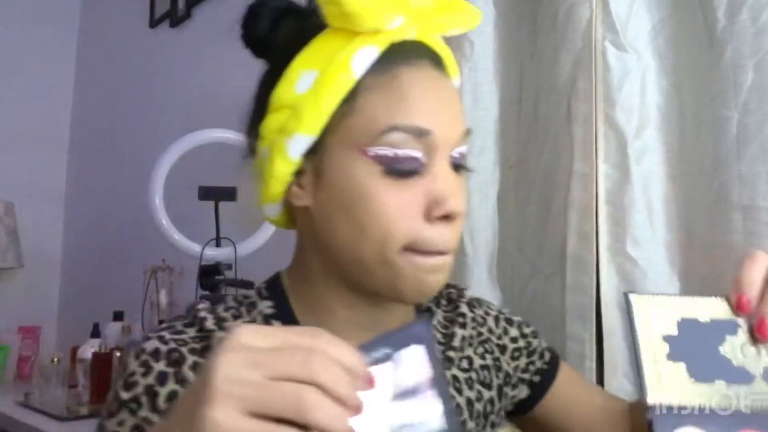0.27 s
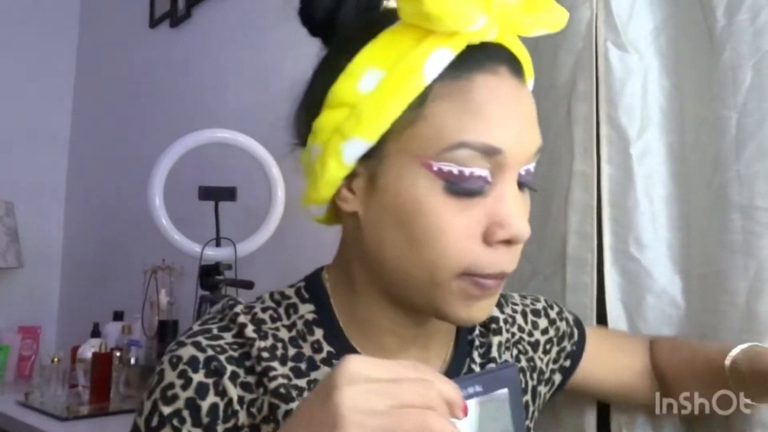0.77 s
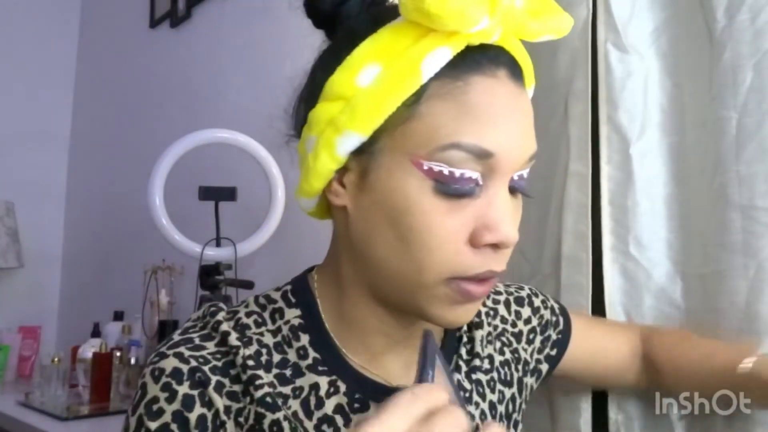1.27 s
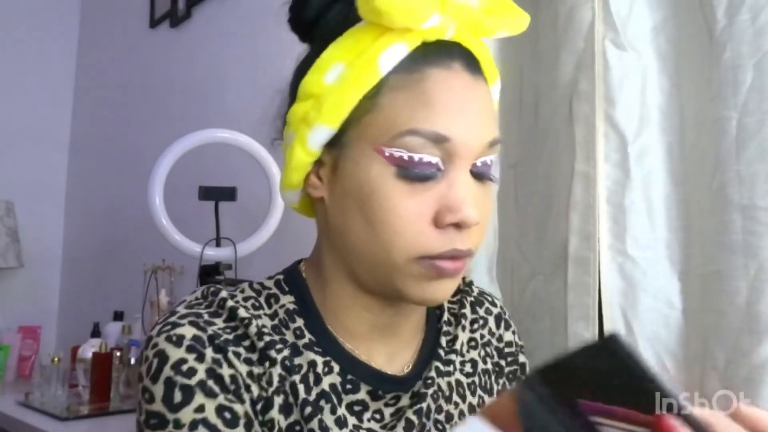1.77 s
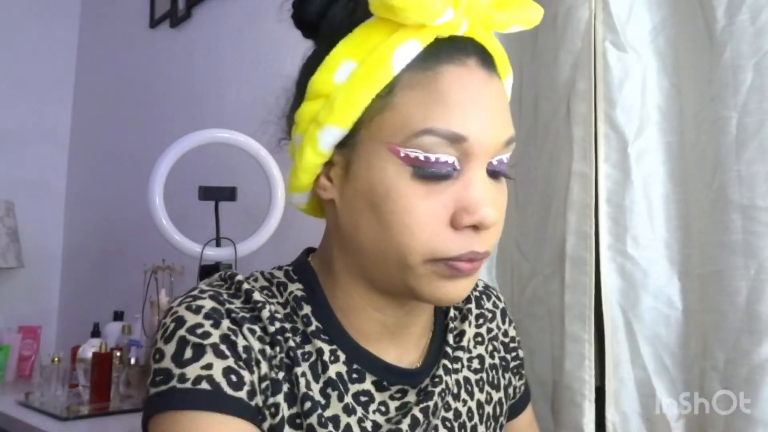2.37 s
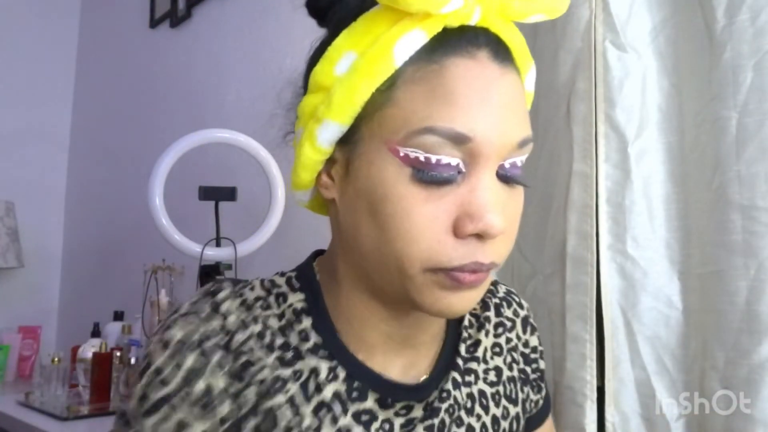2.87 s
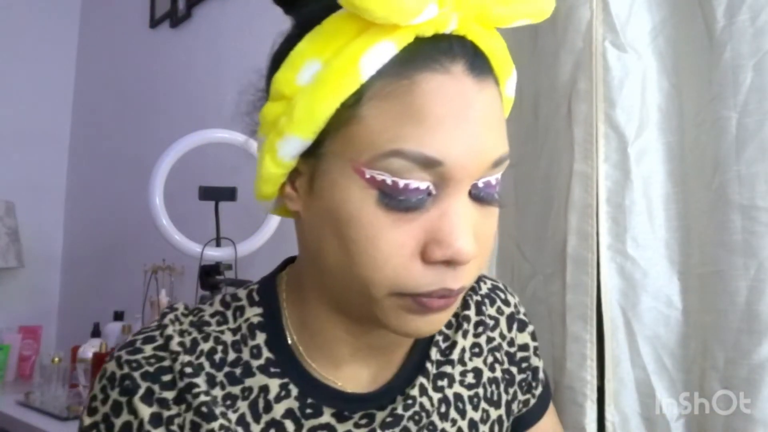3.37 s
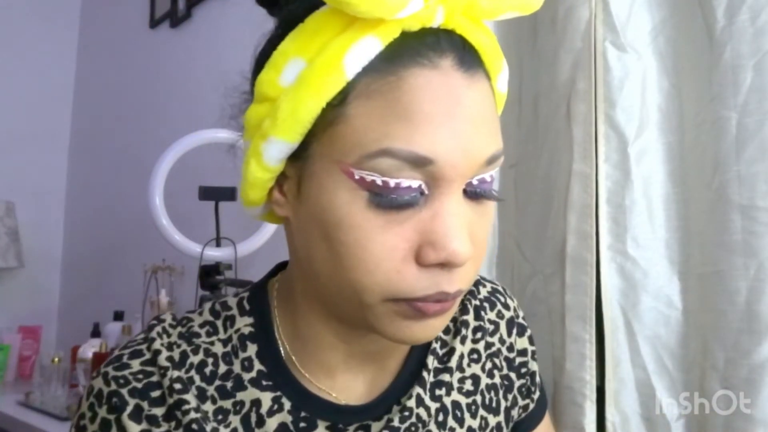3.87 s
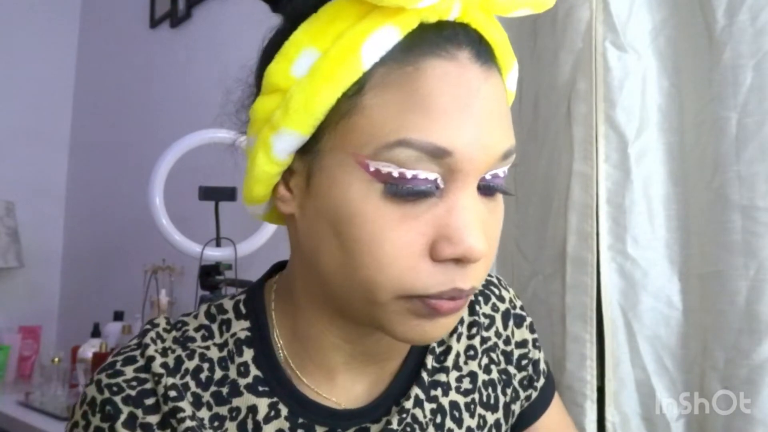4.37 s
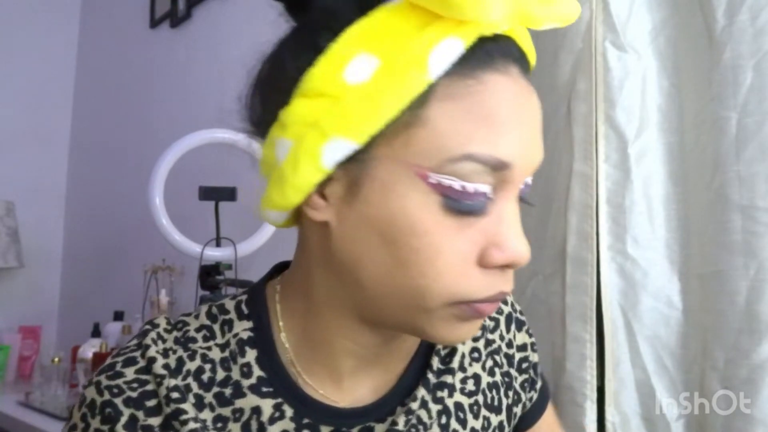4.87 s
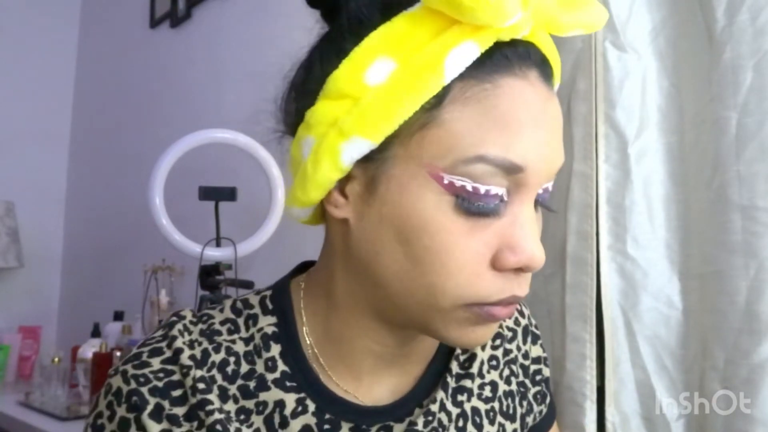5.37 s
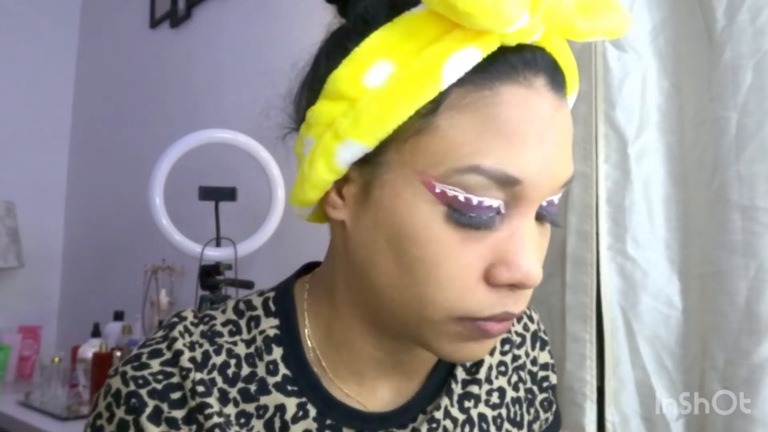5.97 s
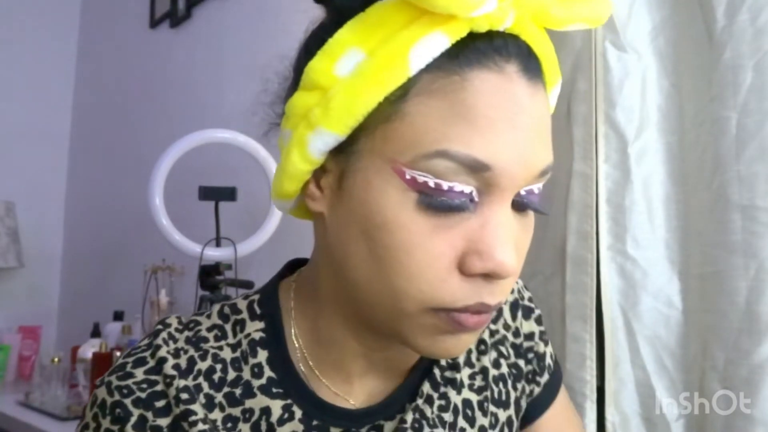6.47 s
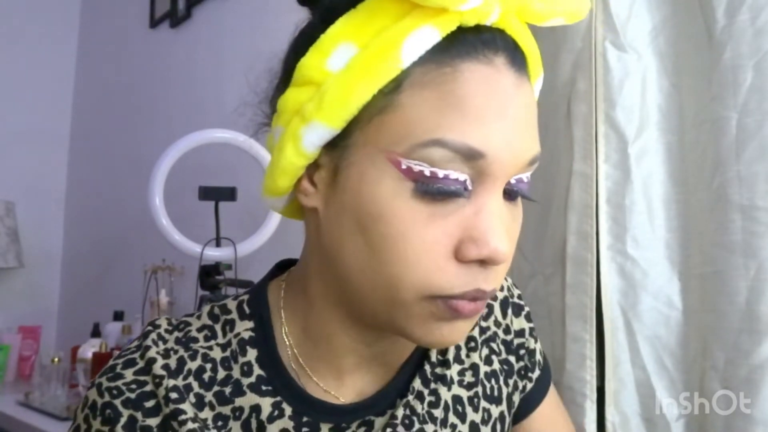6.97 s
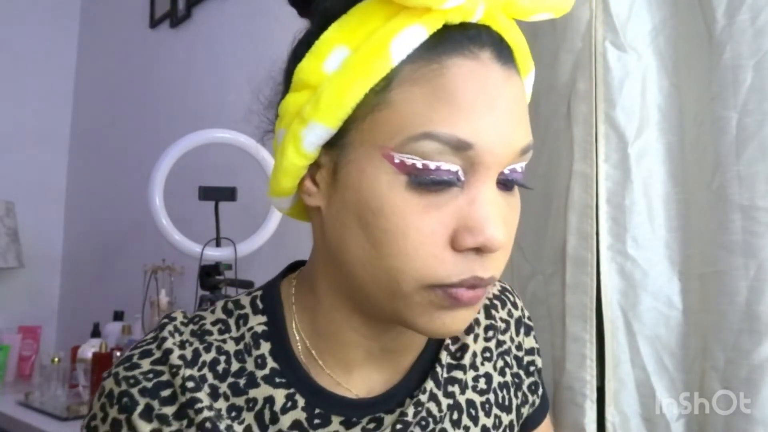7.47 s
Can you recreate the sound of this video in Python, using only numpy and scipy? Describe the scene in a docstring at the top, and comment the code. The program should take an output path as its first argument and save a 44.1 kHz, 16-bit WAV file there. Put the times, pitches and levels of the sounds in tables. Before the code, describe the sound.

Close, slightly dull stereo pickup of makeup things being handled indoors. First small drags and a boomy palette drop with a scrape, then a duller knock, then a scatter of faint ticks from brushes and a tiny metallic clink. After a quiet gap come the sharp clack, hollow taps and snaps of a plastic case. A wavering low fan drone runs throughout.

```python
"""A fan drones with a wavering hum over a low rumble and faint hiss in a small bedroom.
Makeup palettes are put down on a table, then brushes are sorted and a plastic case is handled.
Each contact is a click ringing the resonances of its object, with echoes from table and walls.
Sliding and scuffing in between are noise, shaped into short swells and coloured by filters."""
import sys
import numpy as np
from scipy import signal
from scipy.fft import rfft, irfft, next_fast_len
from scipy.io import wavfile
from scipy.ndimage import map_coordinates

SR = 44100
rng = np.random.default_rng(int(sys.argv[2]) if len(sys.argv) > 2 else 0)


def generate_wav(signal):
    """Clip the signal to [-1, 1] and save it as 16-bit WAV at the path in sys.argv[1]."""
    frames = np.transpose(np.atleast_2d(signal))
    scaled = np.clip(frames, -1, 1) * 32767
    pcm = np.round(scaled).astype(np.int16)
    wavfile.write(sys.argv[1], SR, pcm)


N = 340011
TIME = np.arange(N) / SR   # seconds

# resonances of the brush handles: f/Hz, width/Hz, level/dB
HANDLE_RESONANCES = [(1116, 250, -4.5), (2045, 213, 3.5), (2830, 620, -2), (3603, 144, 6.5),
                     (4300, 490, -5.5), (5270, 460, -3.5), (6200, 440, -2), (9000, 1600, -13.5)]


def from_db(db):
    """Turn decibels into a gain."""
    return 10 ** (np.asarray(db) / 20)


def rms_one(x):
    """Scale to an average strength (rms) of 1."""
    return x / np.sqrt(np.mean(x ** 2) + 1e-20)


def in_time(rows):
    """Read each column of a curve at every sample, with straight lines between the points."""
    s, *columns = np.transpose(rows)
    return [np.interp(TIME, s, c) for c in columns]


def cut(x, hz, kind, order=2):
    """Butterworth filter: "low" keeps what is below hz, "high" what is above."""
    sos = signal.butter(order, min(hz, SR / 2 - 100), kind, fs=SR, output="sos")
    return signal.sosfilt(sos, x)


def drift(rate):
    """Smooth random wander around 0, spread about 1, through `rate` random points per second."""
    coarse = TIME[::24]
    points = rng.standard_normal(len(coarse))
    curve = map_coordinates(points, [coarse * rate], order=3, mode="wrap")
    return np.interp(TIME, coarse, curve)


def two_port_noise(size):
    """Sound from all around at two close ports: the same in the bass, unrelated in the treble."""
    mid, side = rng.standard_normal((2, size))
    side = cut(side, 1800, "high", order=1)
    side = cut(side, 230, "high")
    return mid + side * np.array([[1], [-1]])


def coloured(x, spectrum):
    """Give noise a spectrum (f/Hz, level/dB), then scale it to rms 1."""
    hz, db = np.transpose(spectrum)
    size = next_fast_len(N)
    bins = np.maximum(np.arange(size // 2 + 1) * SR / size, 1)
    gain = from_db(np.interp(np.log(bins), np.log(hz), db))
    return rms_one(irfft(rfft(x, size) * gain, size)[:, :N])


def resonate(x, resonances):
    """Ring side-by-side resonances, with alternating signs; a narrow one rings longer."""
    out = 0
    for k, (hz, width, db) in enumerate(resonances):
        r = np.exp(-np.pi * width / SR)
        poles = [1, -2 * r * np.cos(2 * np.pi * hz / SR), r * r]
        gain = (-1) ** k * from_db(db) * (1 - r * r) / 2
        out = out + gain * signal.lfilter([1, 0, -1], poles, x)
    return out


def reflections(t, t60):
    """A dense train of echoes, 60 dB weaker after t60 seconds; average energy 1 per channel."""
    fade = from_db(-60 * t / t60)
    onset = 1 - np.exp(-t / .001)
    return rms_one(two_port_noise(len(t)) * fade * onset) / np.sqrt(len(t))


def contact(size, smear_s):
    """A click smeared in time as it bounces about inside the object."""
    w = 2j * np.pi * np.arange(size // 2 + 1) * SR / size
    spread = 1
    # four looped delays, each shorter than the last, smear the click but keep its spectrum
    for lag in smear_s * rng.uniform(.85, 1.15, 4) / np.sqrt(3) ** np.arange(4):
        spread = spread * (np.exp(-w * lag) - .6) / (1 - .6 * np.exp(-w * lag))
    port_lag = np.array([[0], [rng.uniform(.00004, 0.00011)]])   # s; the nearer port hears it first
    click = irfft(spread * np.exp(-w * port_lag), size)
    return click * (np.arange(size) < size // 2)


def strike(hits, body, level_db, smear_s, near_db, near_t60, bright_hz, pan_db):
    """Each contact, with near echoes and a room tail, is heard through the object's resonances."""
    room_db, room_t60_s = -3.5, 0.25
    out = np.zeros((2, N + SR))
    t = np.arange(12000) / SR
    for s, db, bright_db in hits:
        near = from_db(near_db) * reflections(t, near_t60)
        room = from_db(room_db) * reflections(t, room_t60_s)
        sound = resonate(contact(len(t), smear_s) + near + room, body)
        dull = cut(sound, bright_hz, "low", order=1)
        sound = dull + from_db(bright_db) * (sound - dull)   # a harder contact carries more treble
        at = round(s * SR)
        out[:, at:at + len(t)] += from_db(db + level_db) * rms_one(sound)
    # pan_db: how much louder the first channel is than the second
    return out[:, :N] * from_db(np.array([[pan_db], [-pan_db]]) / 2)


def fan():
    """A sine hum that wavers at random in pitch and level, over noise for rumble and faint hiss."""
    # the hum swells and sinks: t/s, level before flutter/dB
    hum_level = [(0.08, -71), (0.39, -44.5), (0.58, -60.5), (0.76, -42.5), (0.95, -61), (1.13, -46),
                 (1.4, -61.5), (2.68, -46.5), (3.47, -60.5), (3.62, -52.5), (4.2, -51), (4.7, -56),
                 (5.85, -55.5), (6.5, -45), (7.02, -43.5), (7.21, -59.5), (7.58, -47), (7.71, -61)]
    # spectrum of rumble and hiss: f/Hz, level/dB
    air_spectrum = [(25, -30.5), (55, -2.5), (118, -5.5), (150, -8), (180, -13.5), (220, -13), (270, -19),
                    (360, -24.5), (420, -31), (550, -24.5), (690, -33.5), (1000, -36), (4500, -42.5),
                    (11000, -49)]
    hum_hz, waver_hz = 145, 3.4
    flutter_db, flutters_per_s, air_db = 2.8, 9, -51
    level_db, = in_time(hum_level)
    phase = 2 * np.pi * np.cumsum(hum_hz + waver_hz * drift(14)) / SR
    loudness = from_db(level_db + flutter_db * drift(flutters_per_s))
    hum = loudness * rms_one(np.sin(phase))
    return hum + from_db(air_db) * coloured(two_port_noise(N), air_spectrum)


def scuffs(grain_db=3.5, slips_per_s=220):
    """Brief stick-slip drags, coloured by the handles; a lighter drag sounds higher."""
    # things dragged over each other: middle t/s, half length/s, level before the swell/dB, top f/Hz
    drags = [(0.304, 0.055, -56.5, 2800), (0.414, 0.055, -65.5, 8000), (0.604, 0.09, -61.5, 1000),
             (0.997, 0.046, -55.5, 1700), (1.827, 0.12, -64, 7000), (2.808, 0.065, -68, 1690),
             (3.474, 0.029, -53, 2100), (3.538, 0.034, -54, 1690), (4.976, 0.085, -63.5, 3040),
             (5.082, 0.1, -63.5, 3100), (5.253, 0.075, -62, 2180)]
    out = np.zeros((2, N))
    slips = from_db(grain_db * drift(slips_per_s))
    half = 8192   # samples either side of the middle
    for s, half_length_s, db, hz in drags:
        span = slice(round(s * SR) - half, round(s * SR) + half)
        friction = resonate(slips[span] * two_port_noise(2 * half), HANDLE_RESONANCES)
        band = cut(cut(friction, hz, "low"), hz / 2, "high")
        swell = np.cos(np.pi / 2 * np.clip((TIME[span] - s) / half_length_s, -1, 1)) ** 2
        out[:, span] += from_db(db) * swell * rms_one(band)
    return out


def rubbing(grain_db=2.0, grains_per_s=130):
    """Soft sliding in short strokes: a low scrape and a higher swish share one swell."""
    # strokes over the table: peak t/s, rise/s, fall/s, scrape level/dB, swish over scrape/dB
    strokes = [(0.83, 0.14, 0.25, -57.5, -0.5), (1.83, 0.12, 0.15, -72.5, 12.5),
               (2.45, 0.017, 0.2, -64.5, -3), (2.82, 0.081, 0.14, -68, 2), (3.57, 0.17, 0.29, -66, 3.5),
               (4.36, 0.16, 0.1, -72.5, 7), (5.15, 0.12, 0.4, -72.5, 4), (6.53, 0.056, 0.09, -58.5, -1),
               (6.9, 0.18, 0.18, -61.5, -2)]
    # spectrum of the scrape: f/Hz, level/dB
    scrape_spectrum = [(500, -2), (1200, -2), (1550, -2), (2120, -2.5), (2900, -7), (5000, -66)]
    # spectrum of the swish: f/Hz, level/dB
    swish_spectrum = [(1800, -20), (3000, -12), (3650, -3), (4600, -2.5), (5500, -4.5), (6200, -8),
                      (7200, -7.5), (10500, -15.5)]
    edge_db = -9   # change of level one rise before and one fall after the peak
    scrape, swish = 0, 0
    for s, rise_s, fall_s, db, swish_db in strokes:
        away = np.maximum((s - TIME) / rise_s, (TIME - s) / fall_s)
        swell = from_db(db + edge_db * np.minimum(away, 10))
        scrape = scrape + swell
        swish = swish + swell * from_db(swish_db)
    friction = from_db(grain_db * drift(grains_per_s)) * two_port_noise(N)
    return scrape * coloured(friction, scrape_spectrum) + swish * coloured(friction, swish_spectrum)


def palettes():
    """Two palettes land; the first bounces and sets the table top booming."""
    # palette dropped on the table, bouncing: t/s, relative level/dB, treble gain/dB
    thud_hits = [(0.735, -20, -0.5), (0.75, -22.5, 2.5), (0.835, -25.5, 7), (0.862, -35, 5),
                 (0.894, -44.5, 20), (0.964, -42.5, -18)]
    # second palette knocked down: t/s, relative level/dB, treble gain/dB
    knock_hits = [(2.407, -24, -18), (2.416, -30, 4.5)]
    # resonances of the table top: f/Hz, width/Hz, level/dB
    table_top = [(70.5, 31, -4), (138, 29, 5.5), (182, 22, 6), (252, 23.6, 7.5), (343, 20, 5.5),
                 (507, 54, 1), (598, 19, -13), (762, 23, -5.5), (1050, 410, -12.5), (1317, 79, -9.5),
                 (1970, 610, -22), (2640, 550, -24), (3790, 350, -27), (6450, 3000, -41.5)]
    # resonances of the second palette: f/Hz, width/Hz, level/dB
    palette_body = [(114, 33, 1), (250, 65, -3), (340, 91, -6), (633, 48, 4.5), (717, 32, 2.5),
                    (804, 110, -5.5), (1036, 76, 0.5), (1143, 85, -3), (1435, 110, -8), (2140, 210, -17),
                    (2930, 300, -17), (5340, 2500, -31.5)]
    thuds = strike(thud_hits, table_top, level_db=-16.5, smear_s=.0009,
                   near_db=-0.5, near_t60=.11, bright_hz=1500, pan_db=-0.3)
    knocks = strike(knock_hits, palette_body, level_db=-20.0, smear_s=0.00055,
                    near_db=0.5, near_t60=0.13, bright_hz=1790, pan_db=-1.0)
    return cut(thuds, 55, "high") + cut(knocks, 89, "high")


def brushes():
    """Brush handles tick together and their metal ferrules clink."""
    # handles touching: t/s, relative level/dB, treble gain/dB
    tick_hits = [(2.629, -52, 1), (2.8593, -47.5, -14), (3.3298, -49.5, 11), (3.4451, -47, -5),
                 (3.4898, -36.5, -1), (3.5834, -42.5, -11), (3.5932, -35, -3), (3.6132, -42, 10),
                 (3.636, -40, 10), (3.7851, -44.5, 16), (3.8581, -48, 12), (3.8848, -46, 0),
                 (4.3171, -40, -13), (4.3385, -41.5, 14), (5.058, -49.5, -16), (5.1297, -48, 12),
                 (5.702, -49, -23), (6.8922, -44.5, -3)]
    # ferrules clinking: t/s, relative level/dB, treble gain/dB
    clink_hits = [(4.1784, -38, -6), (4.1865, -53, -6), (4.2398, -43.5, -2)]
    # resonances of the ferrules: f/Hz, width/Hz, level/dB
    ferrule_body = [(2600, 3400, -11), (5900, 280, 9), (6460, 650, 1), (8900, 310, 2), (10100, 1000, -9)]
    ticks = strike(tick_hits, HANDLE_RESONANCES, level_db=-21.5, smear_s=.0013,
                   near_db=-2, near_t60=.09, bright_hz=2500, pan_db=-0.7)
    clinks = strike(clink_hits, ferrule_body, level_db=-21.5, smear_s=0.001,
                    near_db=-2, near_t60=.09, bright_hz=7000, pan_db=-1.5)
    return cut(ticks, 810, "high") + cut(clinks, 1500, "high")


def plastic_case():
    """The shell clacks, light taps sound its hollow, the catch snaps and the lid shuts."""
    # case clacking: t/s, relative level/dB, treble gain/dB
    clack_hits = [(6.371, -28.5, 3), (6.376, -29.5, -14)]
    # light taps on the hollow case: t/s, relative level/dB, treble gain/dB
    tap_hits = [(6.433, -16.5, 4.5), (6.557, -28, 1), (6.678, -31.5, 2.5), (6.849, -30, 20),
                (7.083, -40.5, -14)]
    # sharp snaps of the catch: t/s, relative level/dB, treble gain/dB
    snap_hits = [(6.4345, -30, -2), (6.5765, -28, 3), (6.893, -47, -3)]
    # lid shutting and rattling: t/s, relative level/dB, treble gain/dB
    lid_hits = [(6.752, -23, 7.5), (6.781, -29, -19), (6.792, -33.5, -24.5)]
    # resonances of the shell: f/Hz, width/Hz, level/dB
    shell = [(223, 75, 0.5), (477, 44, 6.5), (547, 42, -1), (763, 37, -6.5), (1064, 52, -9), (1310, 19, 8),
             (2090, 88, 0.5), (2810, 70, -8), (3110, 91, -4), (3380, 130, -4), (4200, 150, -10.5),
             (4610, 200, -7), (6380, 170, -12.5), (9050, 3800, -25.5)]
    # resonances of the hollow: f/Hz, width/Hz, level/dB
    hollow = [(705, 290, -5), (1102, 86, 8.5), (1290, 110, 3.5), (1980, 210, -1.5), (3180, 680, -14),
              (4650, 290, -19), (6100, 350, -18.5), (10200, 900, -29)]
    # resonances of the catch: f/Hz, width/Hz, level/dB
    catch = [(2330, 490, 6.5), (4100, 1100, 3.5), (6200, 1400, -2.5), (10800, 2200, -14)]
    # resonances of the lid: f/Hz, width/Hz, level/dB
    lid_body = [(229, 43, 8), (377, 33, 2), (498, 49, -2), (855, 200, -5), (1110, 170, -4), (1348, 41, 4),
                (1780, 120, -5.5), (2035, 79, 1.5), (2470, 220, -2.5), (3190, 146, 1), (3430, 360, -2.5),
                (4460, 860, -7.5), (5550, 800, -11.5), (6860, 500, -13), (8200, 2400, -26.5)]
    clacks = strike(clack_hits, shell, level_db=-19.0, smear_s=0.00063,
                    near_db=3.5, near_t60=0.14, bright_hz=2180, pan_db=0.2)
    taps = strike(tap_hits, hollow, level_db=-27.5, smear_s=0.00038,
                  near_db=0.5, near_t60=0.085, bright_hz=2200, pan_db=-0.5)
    snaps = strike(snap_hits, catch, level_db=-26.5, smear_s=0.00031,
                   near_db=4, near_t60=0.014, bright_hz=4000, pan_db=-0.5)
    lid = strike(lid_hits, lid_body, level_db=-21.5, smear_s=0.0007,
                 near_db=6, near_t60=0.15, bright_hz=2200, pan_db=-1.0)
    return cut(clacks + lid, 120, "high") + cut(taps, 450, "high") + cut(snaps, 1700, "high")


def scene():
    """All the handling, over the fan."""
    return fan() + scuffs() + rubbing() + palettes() + brushes() + plastic_case()


def record(dry):
    """Cut the treble steeply above 11100 Hz."""
    steep = signal.ellip(10, .1, 70, 11100, fs=SR, output="sos")   # .1 dB ripple, 70 dB cut
    return signal.sosfilt(steep, dry)


dry = scene()
out = record(dry)
generate_wav(out)
```